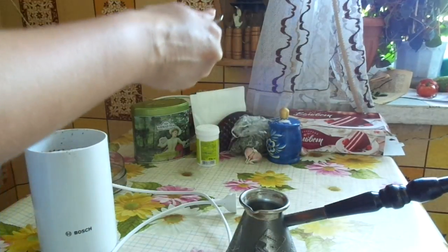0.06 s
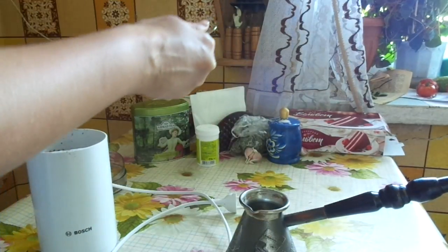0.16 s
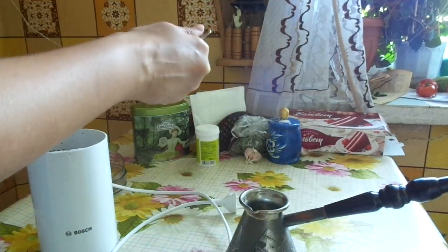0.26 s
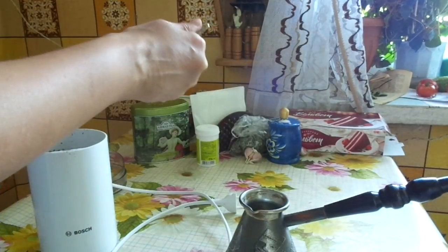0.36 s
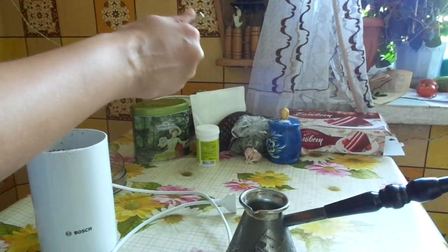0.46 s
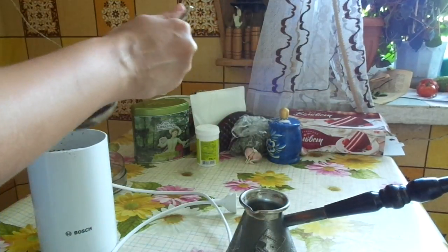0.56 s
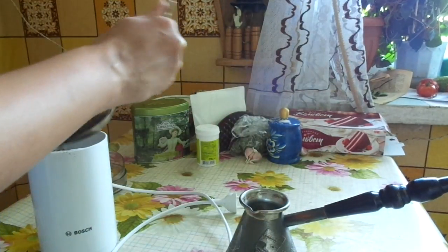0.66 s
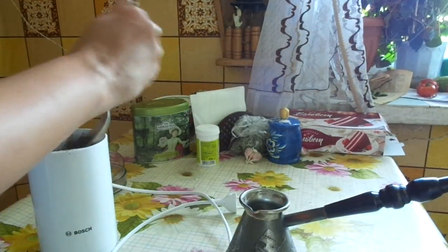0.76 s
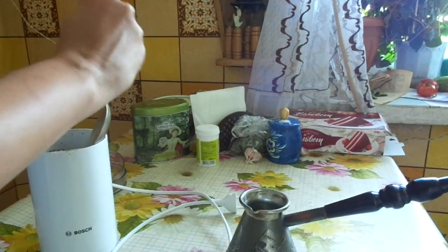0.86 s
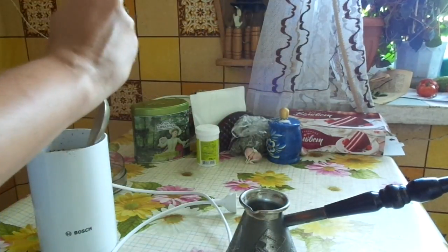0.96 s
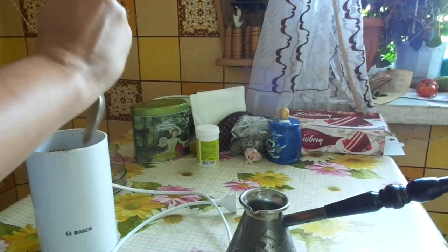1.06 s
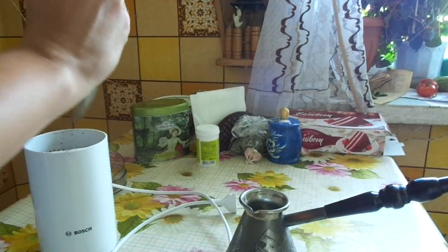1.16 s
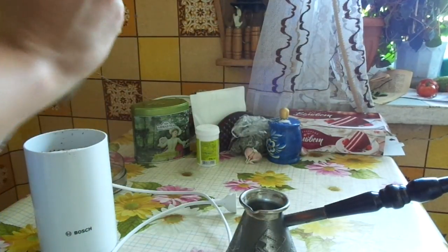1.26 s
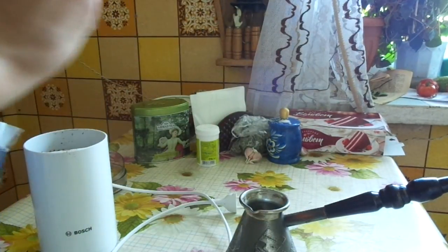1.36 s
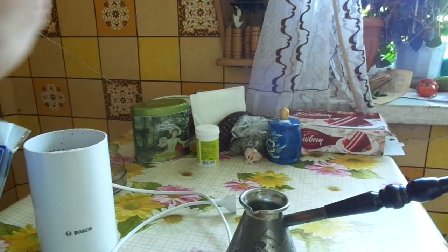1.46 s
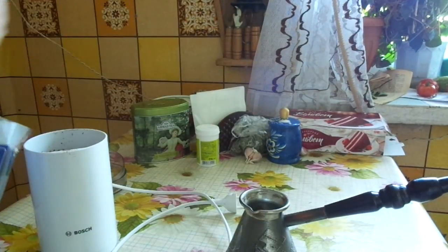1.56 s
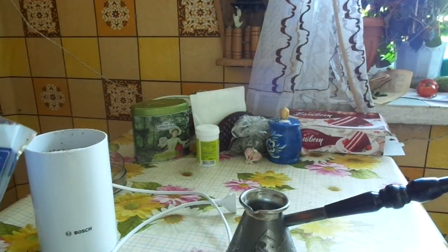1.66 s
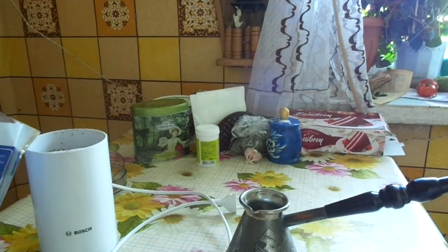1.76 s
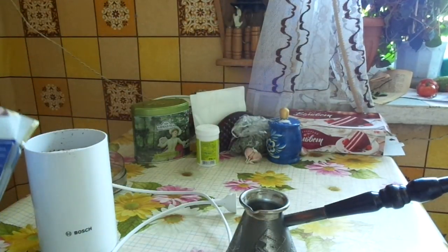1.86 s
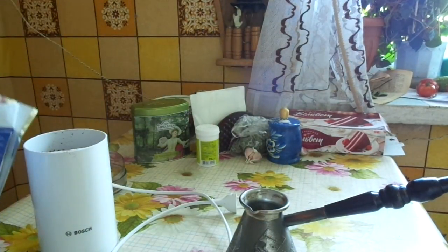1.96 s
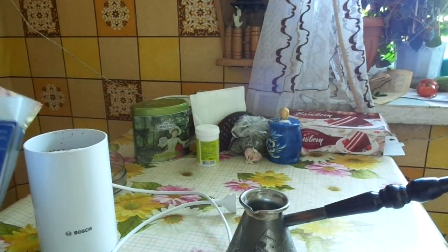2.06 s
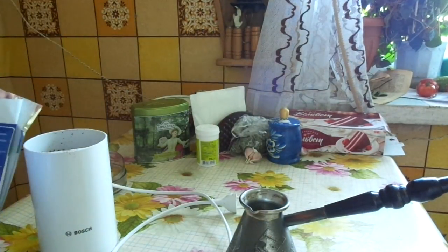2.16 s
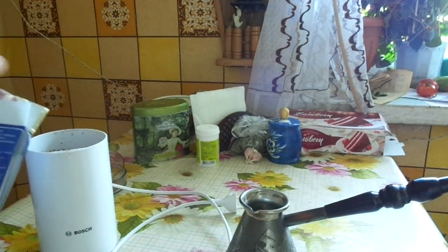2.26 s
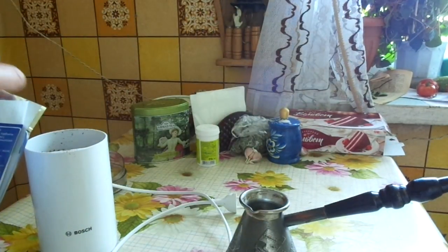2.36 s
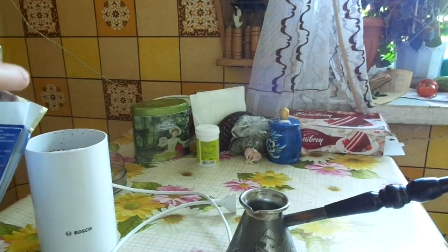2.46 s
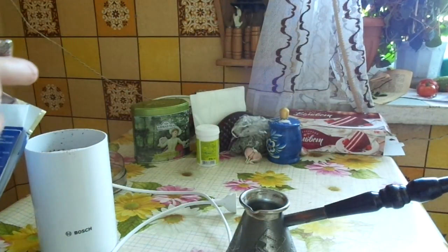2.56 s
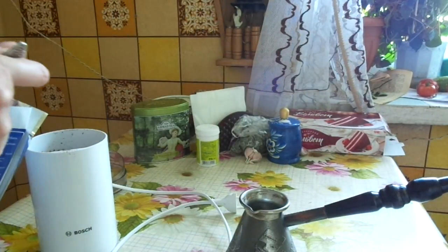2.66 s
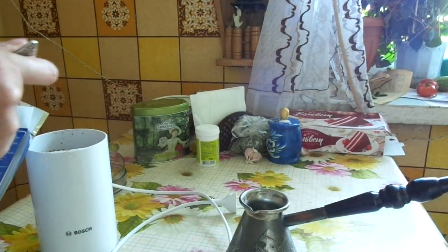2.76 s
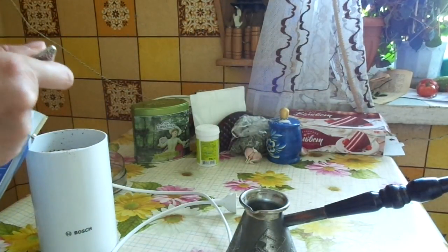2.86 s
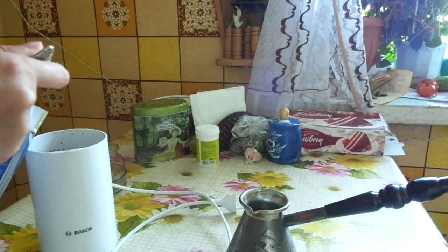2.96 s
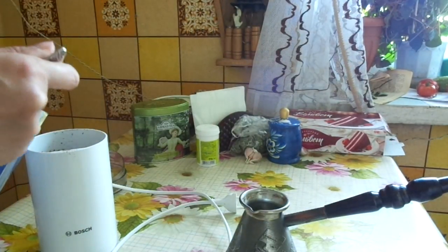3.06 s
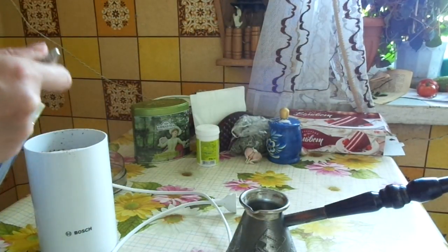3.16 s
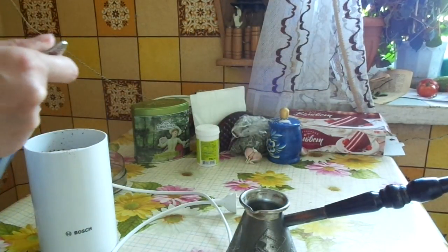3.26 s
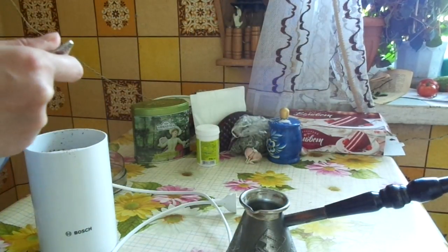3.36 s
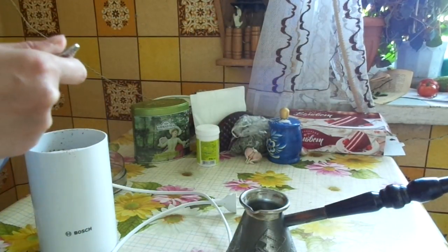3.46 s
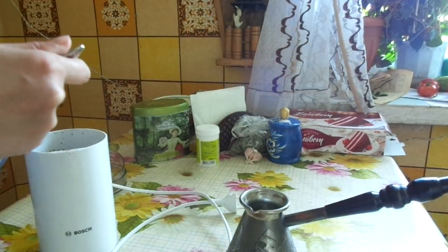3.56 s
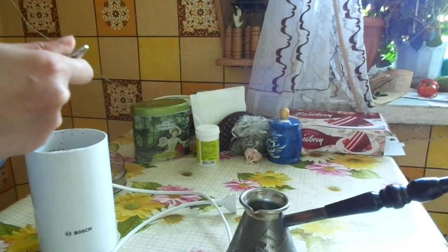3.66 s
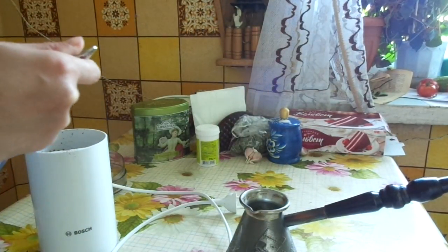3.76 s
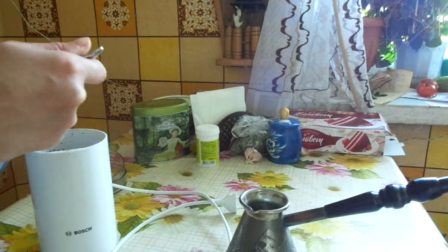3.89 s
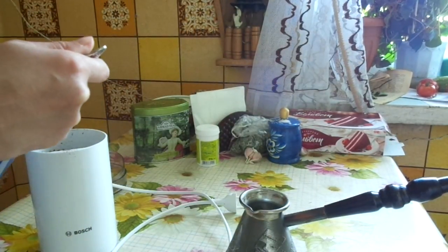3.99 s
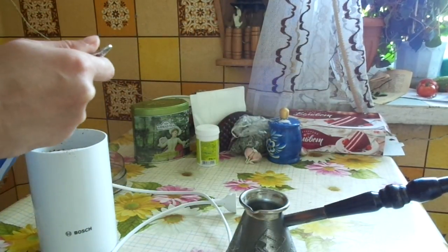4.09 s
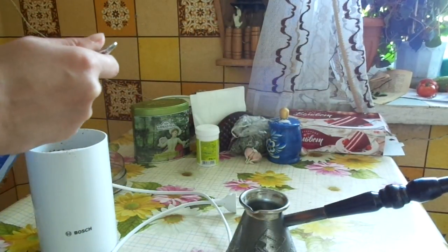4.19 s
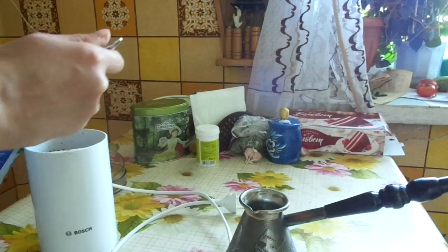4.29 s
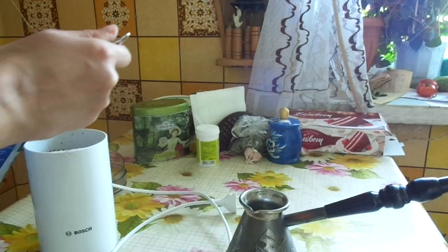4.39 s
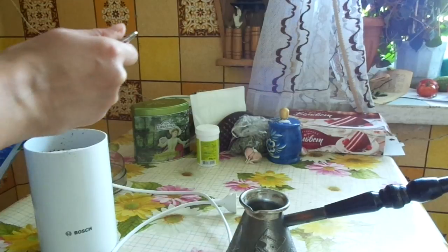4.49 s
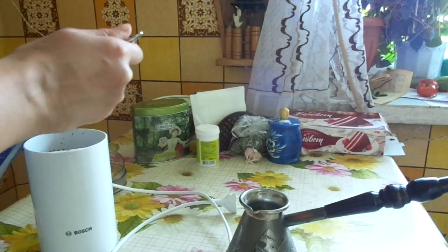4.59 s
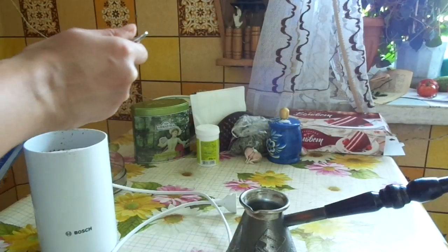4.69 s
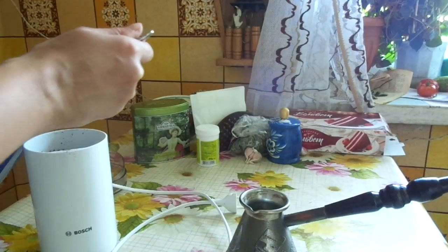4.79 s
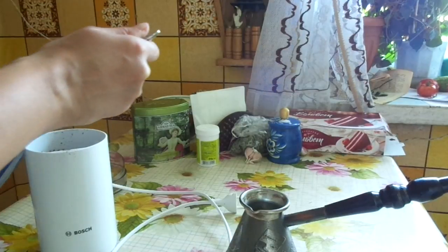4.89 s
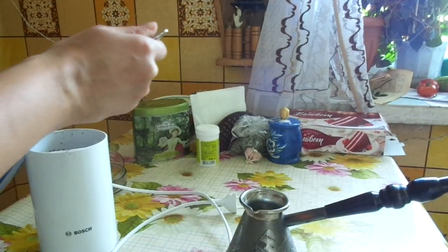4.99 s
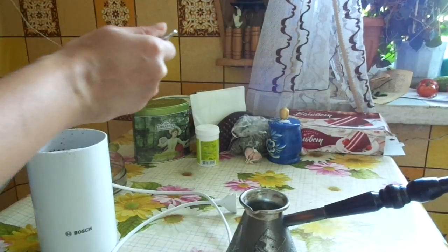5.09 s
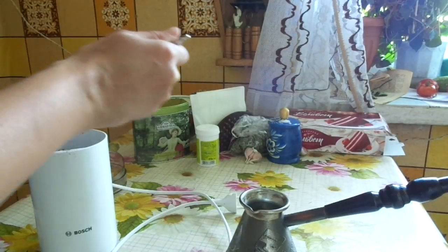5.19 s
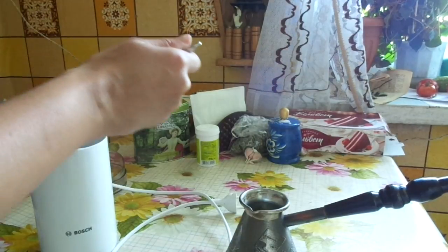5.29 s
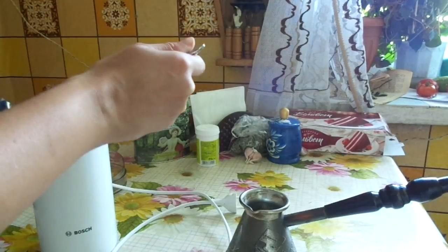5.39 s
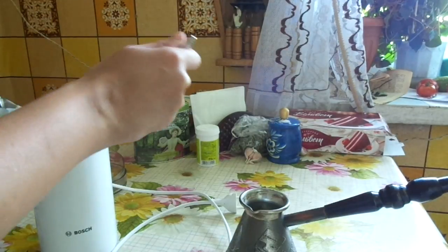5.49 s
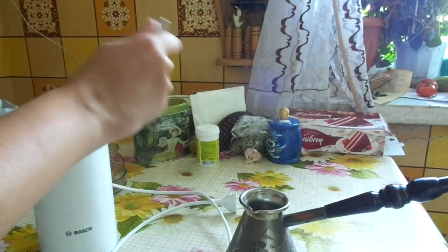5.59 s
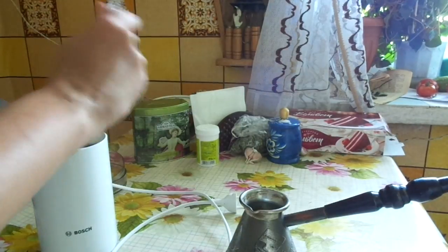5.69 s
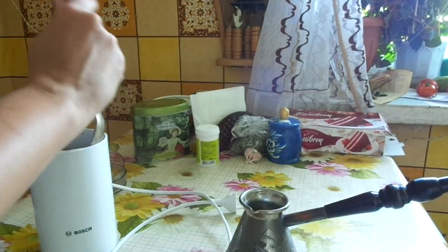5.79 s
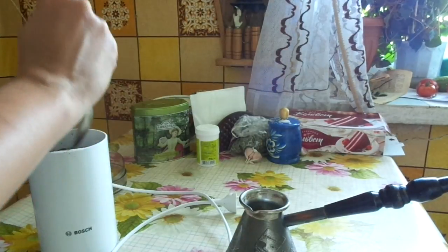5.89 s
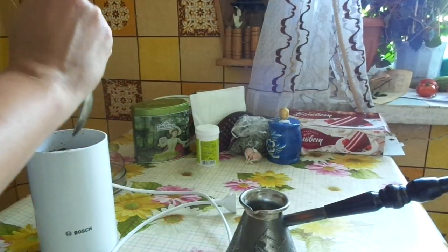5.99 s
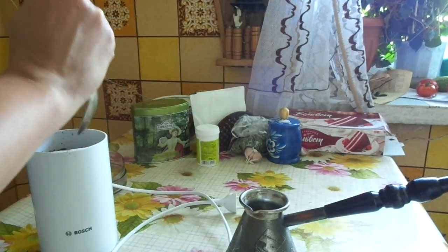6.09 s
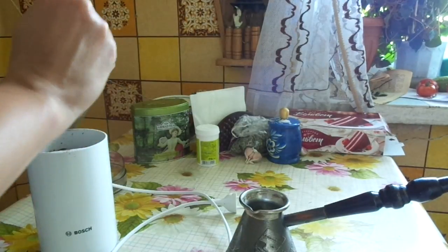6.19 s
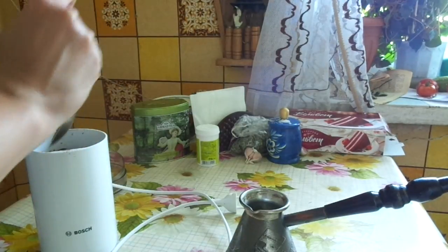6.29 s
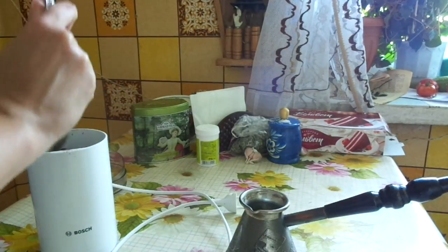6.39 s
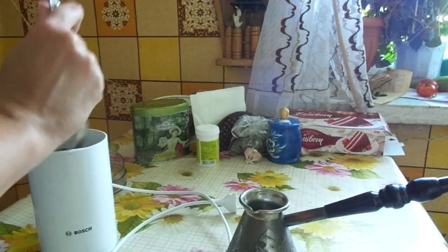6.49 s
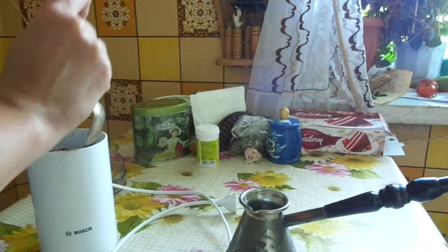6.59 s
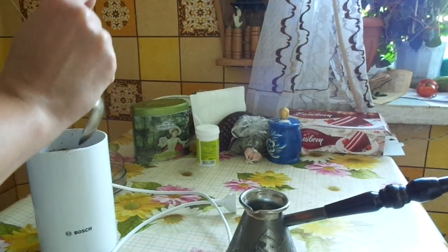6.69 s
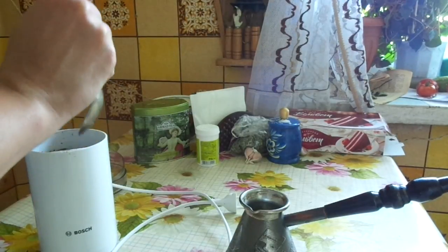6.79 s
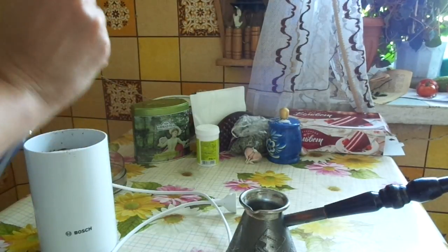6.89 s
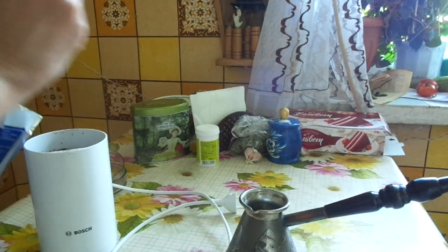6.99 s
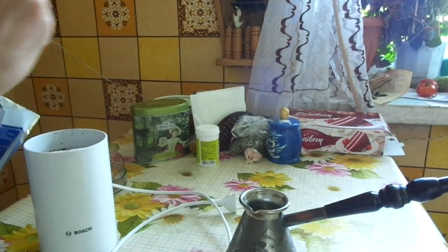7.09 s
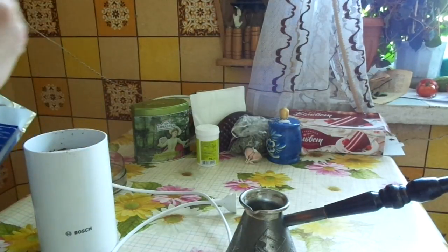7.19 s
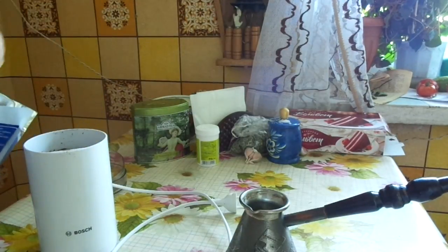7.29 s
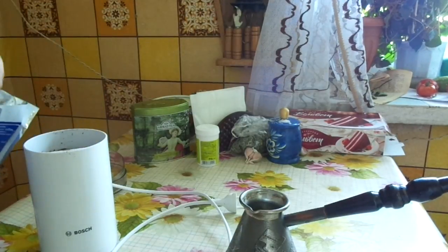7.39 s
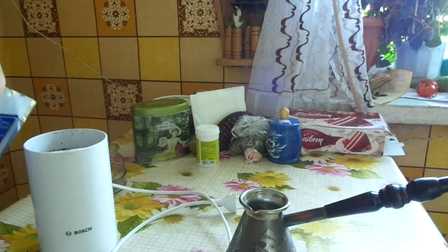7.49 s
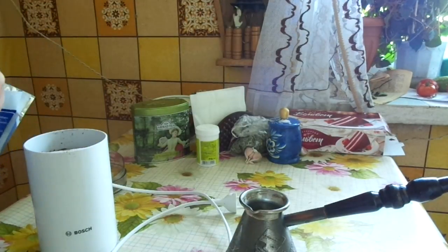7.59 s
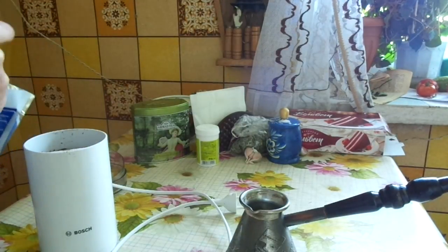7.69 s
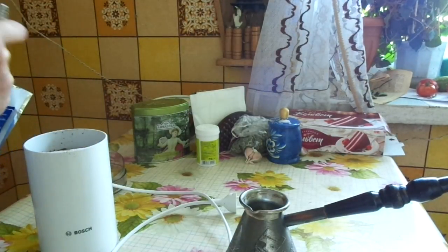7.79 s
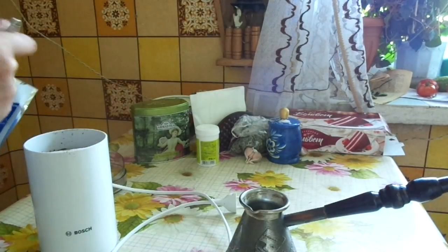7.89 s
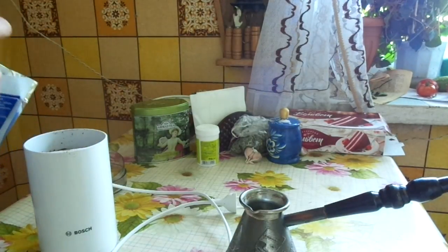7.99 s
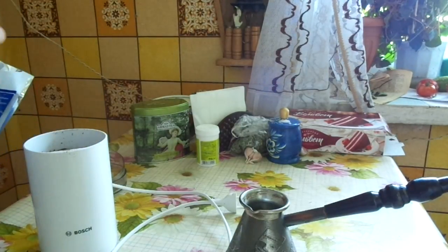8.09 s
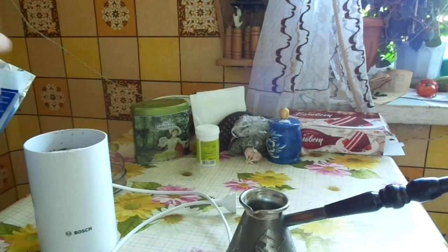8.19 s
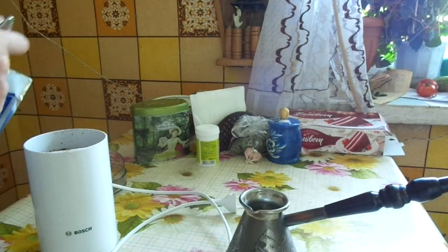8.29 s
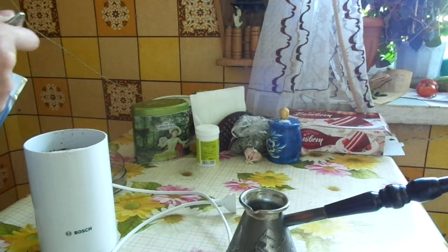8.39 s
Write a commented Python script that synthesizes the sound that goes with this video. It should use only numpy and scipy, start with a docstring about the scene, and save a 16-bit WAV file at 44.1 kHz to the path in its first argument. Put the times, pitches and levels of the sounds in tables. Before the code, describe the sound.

A spoon scoops hard beans from a crackling bag and tips them rattling into a metal grinder bowl, with a hollow knock midway.

```python
"""Coffee beans shift, crunch and clack in a foil bag as a spoon digs them out in a quiet tiled kitchen.
Crunch is a mass of short damped tones under crackling foil; clacks are single tones with thump and snap.
Beans rain on a ringing steel bowl: noise and single blows drive its resonances. The sliding spoon sings,
and its knocks on the hollow grinder body ring as decaying sines. A fridge compressor hums far off
as a few shaft orders, over steady coloured noise; the sound is nearly mono."""
import sys
import numpy as np
from scipy import signal
from scipy.fft import rfft, irfft, next_fast_len
from scipy.io import wavfile
from scipy.ndimage import uniform_filter1d, map_coordinates

SR = 44100
rng = np.random.default_rng(int(sys.argv[2]) if len(sys.argv) > 2 else 0)


def ratio_of_db(decibels):
    """Turn decibels (scalar or array-like) into linear amplitude factors; 0 dB maps to 1."""
    return 10 ** (np.asarray(decibels, float) / 20)


def master_out(mix):
    """Clip the mix to full scale and print it as 16-bit PCM to the path in sys.argv[1]."""
    frames = np.transpose(np.atleast_2d(mix))
    ceiling = np.clip(frames, -1, 1)
    pcm = np.round(ceiling * 32767).astype(np.int16)
    wavfile.write(sys.argv[1], SR, pcm)


N = 372644
TIME = np.arange(N) / SR


def unit(x):
    """Scales a signal to rms 1."""
    return x / np.sqrt(np.mean(x ** 2) + 1e-20)


def along(points, hz):
    """Reads a curve of (Hz, value) points on a log frequency axis."""
    f, v = np.transpose(points)
    return np.interp(np.log(hz + 1), np.log(f + 1), v)


def gesture(tables, rest):
    """Joins the (s, value) curves of several strokes, with a rest value between them."""
    out = np.full(N, float(rest))
    for rows in map(np.array, tables):
        inside = (TIME >= rows[0, 0]) & (TIME <= rows[-1, 0])
        out[inside] = np.interp(TIME[inside], rows[:, 0], rows[:, 1])
    return out


def filtered(x, response):
    """Filters x by a complex response of frequency."""
    m = next_fast_len(N + SR // 2)
    return irfft(rfft(x, m) * response(np.fft.rfftfreq(m, 1 / SR)), m)[..., :N]


def resonances(modes):
    """Causal response of (Hz, width Hz, dB) modes, summed with alternating sign."""
    def response(f):
        total = 0
        for k, (centre, width, db) in enumerate(modes):
            mode = 1j * f * width / (centre * centre - f * f + 1j * f * width)
            total = total + (-1) ** k * ratio_of_db(db) * mode
        return total
    return response


def band(x, lo_hz, hi_hz):
    """Causal band-pass, scaled to rms 1."""
    edges = [lo_hz, min(hi_hz, .45 * SR)]
    return unit(signal.sosfilt(signal.butter(2, edges, "band", fs=SR, output="sos"), x))


def wobble(rate):
    """A smooth random curve with rate knots a second."""
    return map_coordinates(rng.standard_normal(int(N * rate / SR) + 4), [TIME * rate])


def contacts(count, spread_db):
    """Sample indices and signed sizes of random contacts: many small, a few large."""
    draw = rng.random((count, 3))
    at = (draw[:, 0] * N).astype(int)
    size = np.sign(draw[:, 1] - .5) * ratio_of_db(-spread_db * np.log(draw[:, 2] + .01))
    return at, size


def ticks(count, spread_db, smooth):
    """Random contact clicks over a share of smooth sliding noise, rms 1."""
    at, size = contacts(count, spread_db)
    clicks = unit(np.bincount(at, size, N))
    return unit(clicks + smooth * rng.standard_normal(N))


# Compressor hum. Each row: multiple of the shaft rate, level in dB rms before its waver.
COMPRESSOR_ORDERS = [(2, -74), (5, -77), (9, -68.5), (10, -65.5), (11, -61), (12, -65)]


def fridge():
    """A turning compressor hums at multiples of its shaft rate, each wavering a little."""
    shaft_hz = 48.45
    hum = 0
    for order, db in COMPRESSOR_ORDERS:
        level = np.sqrt(2) * ratio_of_db(db + 0.81 * wobble(7.4))
        hum = hum + level * np.sin(2 * np.pi * (int(order) * shaft_hz * TIME + rng.random()))
    return hum


# Colour of the kitchen air and microphone hiss. Each row: frequency in Hz, relative density in dB per Hz.
AIR_COLOUR = [(15, -58), (25, -10.5), (140, -15), (169, -20), (202, -1.5), (379, -14), (410, -10.5),
              (533, -6.5), (674, -15), (1200, -12), (1730, -17), (2490, -17.5), (3150, -22), (11300, -26),
              (12900, -27), (16800, -71), (22000, -120)]
# Colour of the faint steady noise between the channels, with a narrow peak near 12 kHz.
# Each row: frequency in Hz, relative density in dB per Hz.
SIDE_NOISE_COLOUR = [(15, -62), (25, -15), (1440, -25.5), (2690, -28), (11100, -33), (12000, -3.5),
                     (12900, -38), (16800, -41), (22000, -120)]


def steady_noise(spectrum, db):
    """Steady noise of a given colour, its level drifting slightly."""
    noise = unit(filtered(rng.standard_normal(N), lambda f: ratio_of_db(along(spectrum, f))))
    return ratio_of_db(db + 0.39 * wobble(3.38)) * noise


# Reverberation of the tiled kitchen. Each row: frequency in Hz, time to fall 60 dB in seconds.
KITCHEN_DECAY = [(150, 0.47), (600, 0.39), (2000, 0.23), (10000, 0.19)]


def kitchen(x):
    """Two unrelated noise tails, each frequency dying at its own speed, drawn afresh every half second."""
    out, hop, delay = np.zeros((2, N + SR)), SR // 2, 150  # hop and delay in samples
    for start in range(0, N, hop):
        hz, t, z = signal.stft(rng.standard_normal((2, hop)), SR, nperseg=256)
        decay = ratio_of_db(-60 * t / along(KITCHEN_DECAY, hz)[:, None])
        tail = signal.istft(z * decay, SR, nperseg=256)[1]
        tail = tail / np.linalg.norm(tail[0])
        wet = signal.fftconvolve(x[None, start:start + hop], tail, axes=1)[:, :SR - 200]
        out[:, start + delay:start + delay + wet.shape[1]] += wet
    return out[:, :N]


# Colour of the echo that differs between channels. Each row: frequency in Hz, gain in dB.
ECHO_SIDE_COLOUR = [(40, -22), (120, -32), (300, -39.5), (1500, -35), (4000, -23.5), (11000, -14.5)]


def side_echo(tail):
    """Colours an echo tail for the difference between the channels."""
    return filtered(tail, lambda f: ratio_of_db(along(ECHO_SIDE_COLOUR, f)))


# Knocks of the spoon. Each row: time in seconds, overall level in dB, sharpness (crack) in dB.
SPOON_KNOCKS = [(5.544, -10.5, -4), (5.602, -23.5, -4.5), (5.772, -25, -9.5), (6.486, -25, -6),
                (6.508, -33.5, -15), (6.866, -48, -18), (6.928, -53.5, 6)]
# Modes of the hollow grinder body, shaken by the pour too.
# Each row: frequency in Hz, relative level in dB, time to fall 60 dB in seconds.
GRINDER_MODES = [(64.6, -48, 0.39), (129.8, -19.5, 0.25), (175, -21, 0.18), (310, -19, 0.029),
                 (452.6, 1, 0.066), (618, -14, 0.12), (746, -21.5, 0.14), (1040, -27, 0.05),
                 (1600, 5, 0.012)]


def knocks():
    """Each knock rings the hollow body unevenly; a sharper one wakes upper modes, cracks and rattles more."""
    out, t = np.zeros(N + SR), np.arange(SR // 2) / SR
    for s, db, crack_db in SPOON_KNOCKS:
        noise = rng.standard_normal((3, len(t)))
        buzz = 1 + .3 * band(noise[2], 15, 90)  # loose beans load the walls unevenly
        ring = 0
        for hz, level, t60 in GRINDER_MODES:
            sharpness_db = (crack_db + 2) * (hz > 550)
            ring = ring + ratio_of_db(level + sharpness_db - 60 * t / t60) * np.sin(2 * np.pi * hz * t)
        onset = 1 - np.exp(-t / .0006)
        crack = ratio_of_db(crack_db - 9 - 60 * t / 0.038) * band(noise[0], 990, 5900)
        rattle = ratio_of_db(crack_db - 2.0 - 60 * t / 0.13) * band(noise[1], 330, 1140)
        out[round(s * SR):][:len(t)] += ratio_of_db(db) * (buzz * ring * onset + crack + rattle)
    return out[:N]


# Beans sliding along the spoon, which also brightens the digging.
# Each row: start in seconds, end in seconds, drive of the low modes in dB, drive of the high modes in dB.
SPOON_SCRAPES = [(1.862, 2.06, -62, -48.5), (2.336, 2.79, -72, -59), (5.66, 5.876, -54, -61),
                 (6.384, 6.477, -55, -57), (7.37, 7.676, -55, -55.5), (7.896, 7.943, -45.5, -42.5),
                 (8.027, 8.275, -60, -73)]
# Modes of the steel spoon, two low ones first. Each row: frequency in Hz, width in Hz, gain in dB.
SPOON_MODES = [(4450, 50, -4), (5590, 22, 3), (8600, 70, -8), (9420, 60, -5), (10400, 100, -8),
               (11350, 130, 0)]


def spoon():
    """The steel spoon sings thinly while beans slide along it; the grip decides which modes are free."""
    rub_drive_db = 22.5  # added to the drive of every scrape
    rub, out = ticks(count=4000, spread_db=4.0, smooth=0.3), 0
    for column, modes in enumerate([SPOON_MODES[:2], SPOON_MODES[2:]]):
        stroke = 0
        for start, end, *db in SPOON_SCRAPES:
            fade_db = -6 * (TIME - start) / (end - start)
            stroke = stroke + ratio_of_db(db[column] + fade_db) * (TIME > start) * (TIME < end)
        out = out + filtered(ratio_of_db(rub_drive_db) * stroke * rub, resonances(modes))
    return out


def flow(start, hold, db, dies_db_per_s):
    """Gain of a sliding spoonful: swells up to its start, holds and dies away."""
    swell_db = 1100 * np.maximum(start - TIME, 0)  # 1100 dB/s
    fall_db = dies_db_per_s * np.maximum(TIME - start - hold, 0)
    return ratio_of_db(db - swell_db - fall_db)


# Spoonfuls sliding into the bowl.
# Each row: start of full flow in seconds, its length in seconds, patter drive in dB, steel drive in dB.
SPOONFULS = [(.717, 0.096, -27, -24.5), (5.65, 0.15, -34.5, -25.5), (6.38, 0.064, -36, -34),
             (6.52, 0.01, -58, -30)]
# Freedom of the steel: beans already in the bowl damp it further. One gain in dB at each spoonful's start.
BOWL_FREEDOM = [0, -10, -15, -15]
# Single beans striking the bowl.
# Each row: time in seconds, base drive in dB, steel drive in dB relative to it.
BEAN_DROPS = [(0.689, -29.5, 2.5), (0.7108, -19, -21), (0.7191, -14.5, -4), (0.7367, -20, -2),
              (0.7465, -18, -4), (0.754, -18, 8), (0.7614, -17, 3), (0.7831, -15, 4.5), (0.8054, -27, -8),
              (0.8135, -20, -8), (0.9263, -24, -28), (1.1194, -33.5, -12), (5.659, -23, -12),
              (5.6734, -22.5, 13.5), (5.7276, -22.5, -16), (5.757, -30, -5), (5.8277, -21, -24),
              (5.8587, -23.5, 2), (6.3808, -39, -18), (6.4271, -21, -20), (6.443, -26, -4),
              (6.5268, -34, 1)]
# Modes of the steel bowl. Each row: frequency in Hz, width in Hz, gain in dB.
BOWL_MODES = [(5790, 97, 7), (6050, 95, 1.5), (6400, 130, -4), (6870, 110, 2.5), (7580, 260, -7.5),
              (8440, 95, -1), (9400, 250, -8.5), (10850, 130, 2.5)]
# Modes of the bowl's air and wall, with the same columns and units.
CAVITY_MODES = [(515, 87, 3), (1400, 930, -0.5), (2000, 394, 5.5), (2790, 380, 4.5), (3414, 28, -1.5)]


def pouring():
    """A rain of beans, the loudest one by one, sounds the bowl's cavity and rings its steel."""
    cavity_drive_db, steel_drive_db = 2, 8  # added to every single drop
    rain = ticks(count=9000, spread_db=2.5, smooth=0.99)
    dull = sum(flow(s, hold, db, dies_db_per_s=129) for s, hold, db, _ in SPOONFULS) * rain
    bright = sum(flow(s, hold, db, dies_db_per_s=218) for s, hold, _, db in SPOONFULS) * rain
    bounce = ratio_of_db(-60 * np.arange(200) / 130)  # a bean's contact chatters for a few milliseconds
    for s, db, ring_db in BEAN_DROPS:
        noise = rng.standard_normal((2, len(bounce)))
        soft_blow = bounce * band(noise[0], 1170, 4300)  # a bean is small and hard: little bass
        hard_blow = bounce * np.sign(noise[1])
        dull[round(s * SR):][:len(bounce)] += ratio_of_db(db + cavity_drive_db) * soft_blow
        bright[round(s * SR):][:len(bounce)] += ratio_of_db(db + ring_db + steel_drive_db) * hard_blow
    freedom = ratio_of_db(np.interp(TIME, [s for s, *_ in SPOONFULS], BOWL_FREEDOM))
    rattle = filtered(bright, lambda f: 0.16 * (f / (f - 3000j)) ** 2)  # bean on bean, no ring
    body_modes = [(hz, 2.5 / t60, db) for hz, db, t60 in GRINDER_MODES]
    thud = filtered(0.26 * dull, resonances(body_modes))  # the load shakes the grinder body too
    cavity = filtered(dull, resonances(CAVITY_MODES))
    steel = filtered(freedom * bright, resonances(BOWL_MODES))
    return thud + cavity + steel + rattle


# Single clacks in the bag; the first row, at 1.494 s, is the bag set down on the table with a heavy thump. #
# Each row: time in seconds, overall level in dB, pitch in Hz, thump in dB relative to the overall level.
BAG_CLACKS = [(1.494, -32, 1330, 8), (1.509, -14, 1536, -10), (1.817, -33.5, 1120, -26),
              (1.877, -37, 800, -29), (2.051, -23, 1700, -15), (2.163, -27, 1460, -23),
              (2.361, -29.5, 1710, -23), (2.41, -25, 1420, -15), (2.423, -29, 885, -18),
              (2.477, -24, 935, -27), (2.488, -27, 880, -20), (2.567, -37, 1190, -7),
              (2.604, -24.5, 1200, -20), (2.641, -22.5, 1480, -25), (2.65, -23, 860, -30),
              (2.677, -25.5, 800, -5), (2.727, -20.5, 1470, -25), (2.761, -25.5, 1060, -3),
              (2.835, -33.5, 1360, -23), (2.862, -35.5, 1500, -28), (3.001, -37, 1250, -21),
              (3.027, -29, 890, -10), (3.046, -21, 1030, -7), (3.175, -31.5, 1200, -8),
              (3.245, -34.5, 1600, -7), (3.278, -24, 2000, -2.5), (3.288, -22, 1210, -24),
              (3.327, -19.5, 886, -5), (3.417, -26.5, 1130, -15), (3.478, -17.5, 935, -43),
              (3.766, -36.5, 1740, -23), (4.751, -42, 1220, -21), (4.977, -24, 864, -35),
              (5.038, -41, 2270, -30), (6.751, -42, 1190, -24), (7.165, -42, 1700, -15),
              (7.184, -25, 1470, -3), (7.353, -33, 1350, 0), (7.451, -17, 1810, -2.5),
              (7.61, -18.5, 1580, 0.5), (7.63, -15.5, 1680, 1), (7.737, -19.5, 1620, -24),
              (7.793, -26, 1660, -3.5), (7.894, -27, 1530, -1), (7.924, -20.5, 1900, -23),
              (7.963, -31, 795, -26), (8.057, -22.5, 2010, -19), (8.099, -21, 1630, -0.5),
              (8.203, -39, 1400, -12), (8.338, -38.5, 1420, 3.5), (8.362, -40, 1500, -17)]


def clacks():
    """A hard bean contact: tone, crack, thump and snap, then the loosened beans settle."""
    out, t = np.zeros(N + SR), np.arange(SR // 4) / SR
    press = t / .0011 * np.exp(1 - t / .0011)  # peaks after 1.1 ms
    for s, db, hz, thump_db in BAG_CLACKS:
        vary_db = 6.5 * rng.standard_normal(2)
        # low clacks flex more foil and snap harder: 8 dB less per octave up from 1 kHz
        snap_db = -21.5 - 8 * np.log2(hz / 1000) + vary_db[0]
        settle_db = -18 + vary_db[1]
        noise = rng.standard_normal((4, len(t)))
        tone = press * np.sin(2 * np.pi * hz * t)
        crack = 0.4 * press * band(noise[3], hz / 2, 1.8 * hz)
        settle = band(noise[0], hz / 1.45, 1.4 * hz) * ratio_of_db(settle_db - 60 * t / .16)
        thump = band(noise[1], 134, 510) * ratio_of_db(thump_db - 60 * t / 0.035)
        snap_shape = 1.2 * press + .8 * ratio_of_db(-60 * t / .05)
        snap = band(noise[2], 1500, 4500) * ratio_of_db(snap_db) * snap_shape
        out[round(s * SR):][:len(t)] += ratio_of_db(db) * (tone + crack + settle + thump + snap)
    return out[:N]


# How hard the beans are stirred, one table for each dig.
# Each row: time in seconds, crunch level in dB before its random clumping.
DIG_STROKES = [
    [(1.49, -52), (1.52, -29), (1.66, -61.5), (1.8, -45.5), (1.865, -51.5), (1.885, -36), (1.95, -31.5),
     (2.05, -34), (2.1, -39), (2.25, -35.5), (2.32, -42), (2.37, -33.5), (2.74, -39.5), (2.84, -53),
     (3.0, -48), (3.4, -44.5), (3.5, -44), (3.68, -78), (3.76, -55), (3.95, -75)],
    [(4.3, -64), (4.6, -57), (4.81, -60.5), (4.966, -68), (4.976, -42), (5.2, -77)],
    [(6.7, -86), (6.774, -56.5), (6.89, -102), (7.234, -52), (7.37, -57), (7.4, -41.5), (7.64, -36),
     (7.875, -47), (7.922, -30), (8.002, -49.5), (8.056, -38), (8.45, -62)],
]
# Centre pitch in Hz of the bean contacts, one for each dig: the grip shapes the bag anew.
DIG_PITCHES = [1037, 926, 1400]
# Colour of the crackling foil. Each row: frequency in Hz, gain in dB.
FOIL_COLOUR = [(600, 6), (1500, 11), (2200, 4.5), (2900, 3.5), (3700, -4), (7300, -9.5), (11200, -8.5),
               (13000, -18)]


def digging():
    """Each bean-on-bean contact is a short damped tone near the bag's pitch; the foil crackles above."""
    at, size = contacts(count=4500, spread_db=4.0)
    dig_starts = [rows[0][0] for rows in DIG_STROKES]
    dig = np.clip(np.searchsorted(dig_starts, at / SR) - 1, 0, None)
    hz = np.array(DIG_PITCHES)[dig] * np.exp(.5 * rng.standard_normal(len(at)))
    lag = np.arange(400)  # samples after each contact
    cycles = np.clip(hz, 250, 3400)[:, None] * lag / SR
    strength = (size * (hz / 1000) ** 0.06)[:, None]  # brief high tones start stronger
    envelope = np.exp(-cycles / 1.3) * (1 - np.exp(-4 * cycles))
    tones = strength * np.sin(2 * np.pi * cycles) * envelope
    crunch = unit(np.bincount((at[:, None] + lag).ravel(), tones.ravel())[:N])
    jolts = 0.36 * unit(np.bincount(at, size, N))  # the same contacts shake the foil
    crackle = ticks(count=15000, spread_db=-0.5, smooth=0.3)
    sizzle = unit(filtered(jolts + crackle, lambda f: ratio_of_db(along(FOIL_COLOUR, f))))
    clumps_db = 2.3 * wobble(70)  # beans give way in small slides
    scraping = sum(1. * (TIME > start) * (TIME < end) for start, end, *_ in SPOON_SCRAPES)
    scraping = uniform_filter1d(scraping, int(0.02 * SR))  # 20 ms fades
    foil_db = -0.5 + 0.5 * scraping  # brighter while beans scrape the spoon
    return ratio_of_db(gesture(DIG_STROKES, rest=-120) + clumps_db) * (crunch + ratio_of_db(foil_db) * sizzle)


def scene():
    """Table sounds, their echo, the fridge and steady noise; only a little differs between the channels."""
    bag = filtered(digging() + clacks(), lambda f: (f / (f - 170j)) ** 4)  # a small soft bag radiates no bass
    table = bag + spoon() + pouring() + knocks()
    echo, other_echo = kitchen(table)
    mid = table + ratio_of_db(-7) * echo + fridge() + steady_noise(AIR_COLOUR, db=-55)
    side = side_echo(other_echo) + steady_noise(SIDE_NOISE_COLOUR, db=-76)
    return np.array([mid + side, mid - side])


def roll_off(x):
    """The treble ends steeply here."""
    return signal.sosfilt(signal.butter(12, 13080, fs=SR, output="sos"), x)


def record(dry):
    """The finished mix rolls off in the deep bass and steeply at the top."""
    def rolloff(f):
        return (f / (f - 45j)) ** 3 / (1 + (f / 12400) ** 34)
    mix = filtered(dry, rolloff)
    return roll_off(mix)


dry = scene()
out = record(dry)
master_out(out)
```